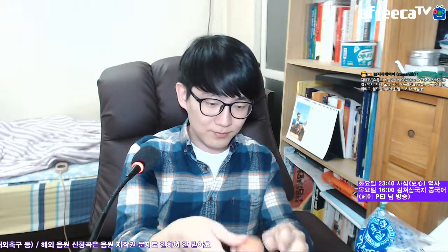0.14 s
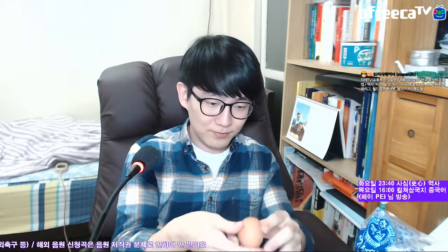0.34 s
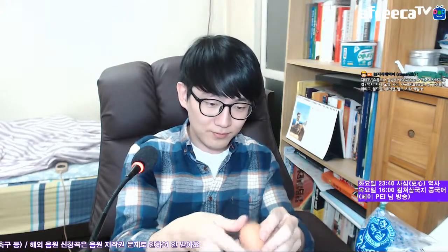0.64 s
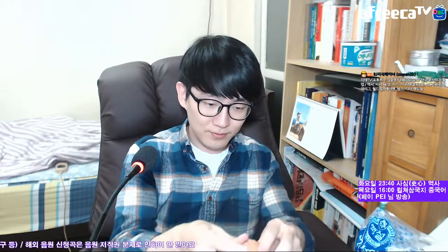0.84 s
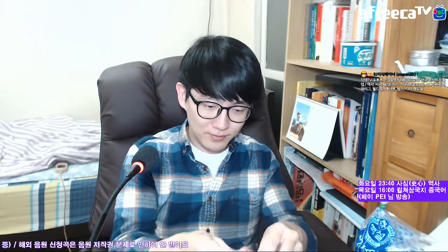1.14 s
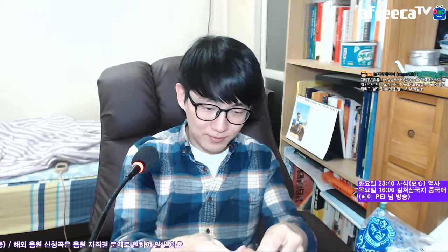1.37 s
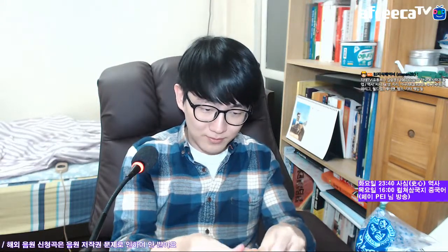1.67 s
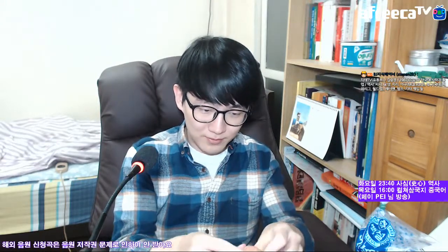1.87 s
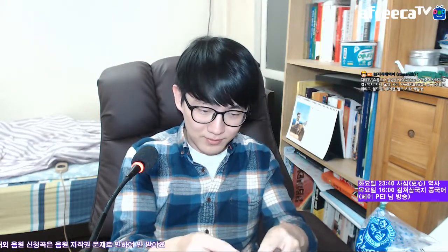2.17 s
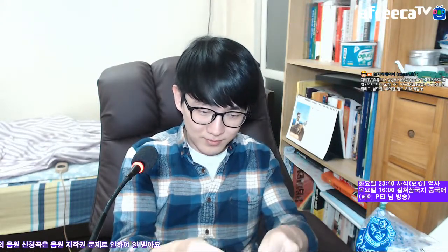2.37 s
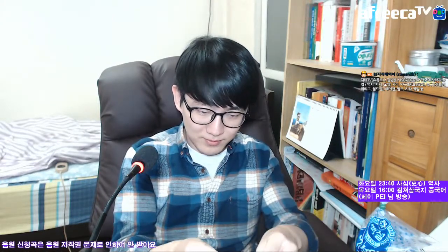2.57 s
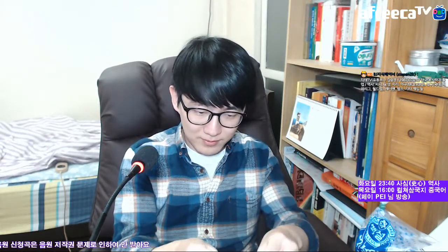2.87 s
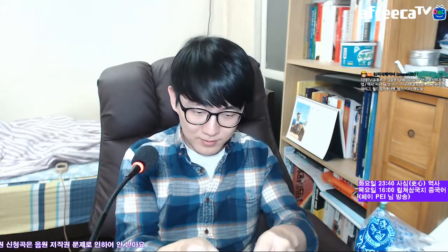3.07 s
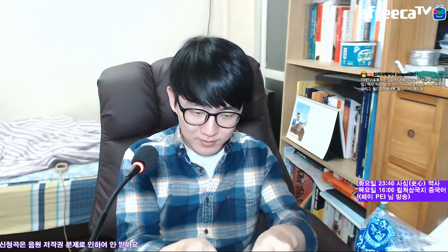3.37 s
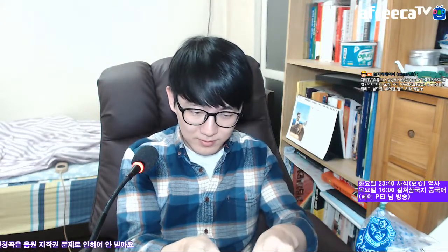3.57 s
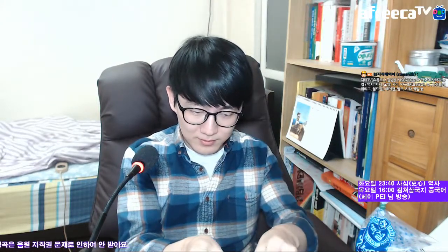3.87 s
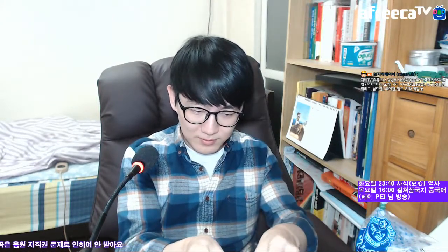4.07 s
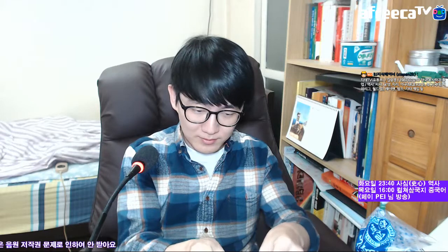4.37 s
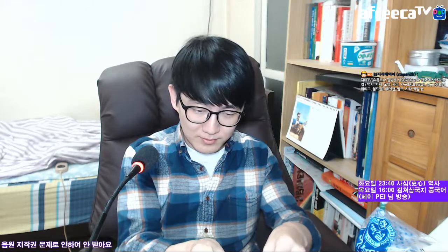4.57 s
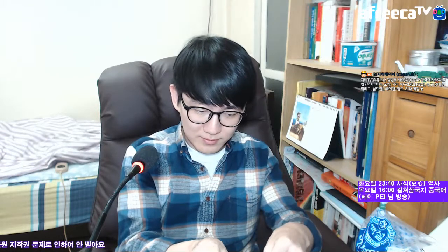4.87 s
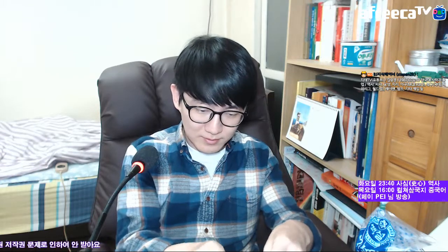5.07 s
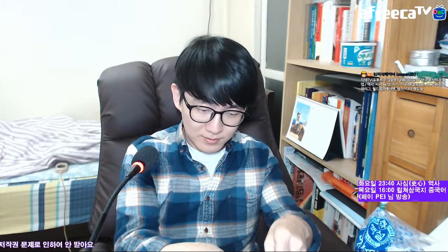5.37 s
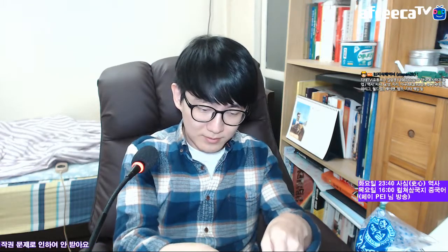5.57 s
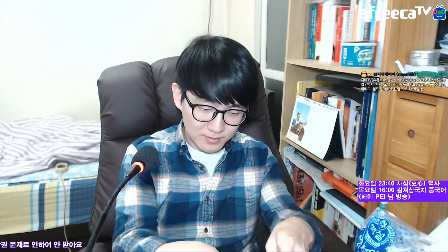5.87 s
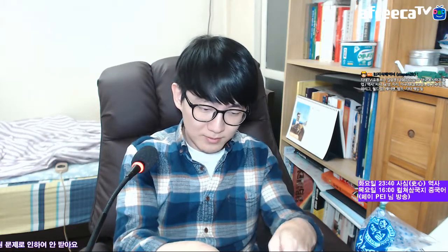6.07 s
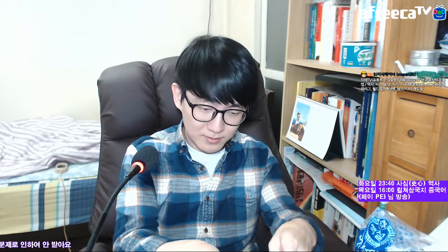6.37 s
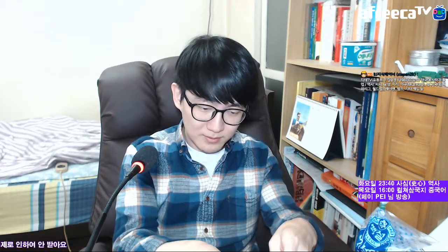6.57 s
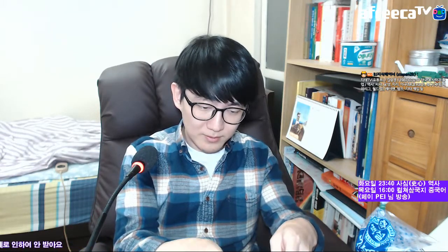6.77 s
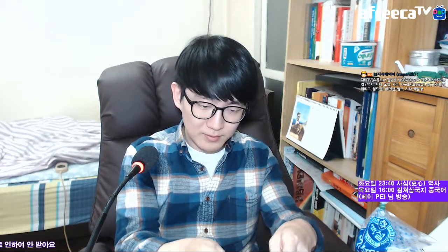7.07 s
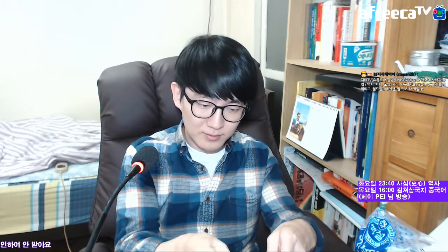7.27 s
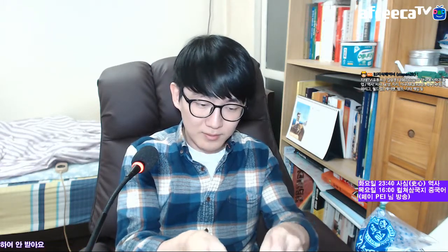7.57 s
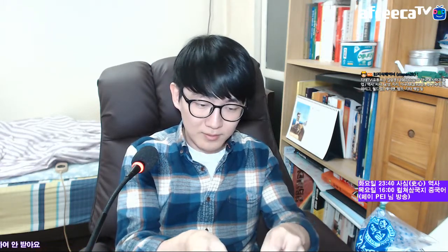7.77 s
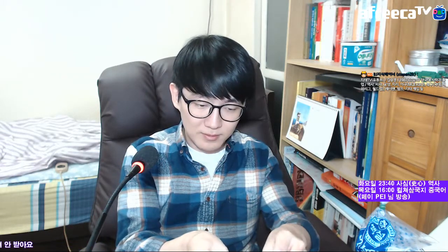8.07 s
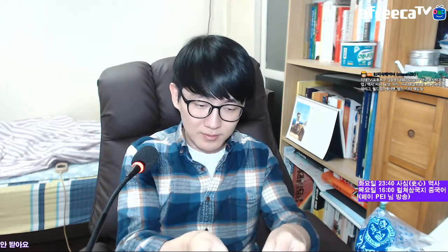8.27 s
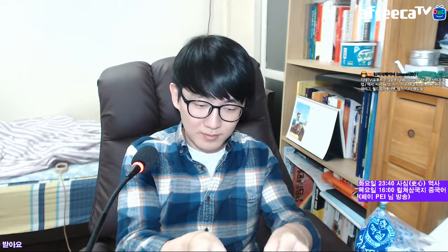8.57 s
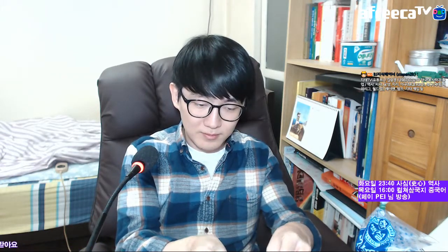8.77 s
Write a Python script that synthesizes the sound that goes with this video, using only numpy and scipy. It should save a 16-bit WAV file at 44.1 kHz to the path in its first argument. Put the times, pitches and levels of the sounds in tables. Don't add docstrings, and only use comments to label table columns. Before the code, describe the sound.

A strong, steady low mains hum, soft fan rumble, faint electronic whines and light hiss fill a small quiet room throughout. Close by, fingers peel a boiled egg. Tiny splinters tick at 0.3 and 0.7 seconds, then a dense, crisp burst of shell cracking and membrane ripping comes at 1.1 to 1.4. Smaller snaps follow around 1.8 to 2.5, and another strong crackling cluster at 3 to 3.4, with soft dull desk thuds and gritty thumb slides. Hollow pops and chips continue from 3.8 to 5.1. Flakes clink in a small ceramic dish near 4.4 and 5.3, fainter around 6. Activity nearly stops from 6 to 7, with slight ticks after 7.1. Brittle cracks and hollow pops return at 7.9 to 8.35, finishing with a sharp snap and bright dish clink around 8.9. The treble sounds thin and streamed.

```python
import sys
import numpy as np
from scipy import signal
from scipy.fft import rfft, irfft, next_fast_len
from scipy.io import wavfile
from scipy.ndimage import uniform_filter1d, map_coordinates

SR = 44100
rng = np.random.default_rng(int(sys.argv[2]) if len(sys.argv) > 2 else 0)


def voltage_ratio(decibels):
    exponent = np.asarray(decibels, float) / 20
    return 10 ** exponent


def log_audio(samples):
    frames = np.atleast_2d(samples).T
    limited = np.clip(frames, -1, 1)
    pcm = np.round(limited * 32767).astype(np.int16)
    wavfile.write(sys.argv[1], SR, pcm)


N = 393372


def unit(x):
    return x / np.sqrt(np.mean(x ** 2) + 1e-20)


def along(points, hz):
    f, v = np.transpose(points)
    return np.interp(np.log(hz + 1), np.log(f + 1), v, left=-120, right=-120)


def wobble(rate):
    knots = rng.standard_normal(int(N * rate / SR) + 4)
    return map_coordinates(knots, [np.arange(N) * rate / SR])


def noise(spectrum):
    m = next_fast_len(N)
    colour = voltage_ratio(along(spectrum, np.fft.rfftfreq(m, 1 / SR)))
    return unit(irfft(rfft(rng.standard_normal(m)) * colour, m)[:N])


def resonance(f, hz, width_hz):
    return 1j * f * width_hz / (hz ** 2 - f ** 2 + 1j * f * width_hz)


def place(times, rows):
    starts = np.round(np.asarray(times) * SR).astype(int)
    at = starts[:, None] + np.arange(rows.shape[1])
    return np.bincount(at.ravel(), rows.ravel(), N + rows.shape[1] + SR)[:N]


def hum():
    # multiple of the mains frequency, peak level/dB
    overtones = [(1, -27.2), (2, -60.5), (3, -76), (4, -76), (5, -70.5), (7, -68), (8, -79.5), (9, -77),
                 (11, -69), (13, -74.5), (15, -79), (17, -86), (19, -85), (23, -84)]
    # f/Hz, peak level/dB, wander/Hz, onset t/s
    whines = [
        (368, -63, 1.5, 0),
        (3849, -80, 8, 0),
        (3860, -82, 12, 7.8),
        (10002, -82, 8, 4.95),
        (11434, -85, 3, 0),
    ]
    mains_hz, mains_start_s = 59.994, .0016
    t = np.arange(N) / SR
    turn = 2 * np.pi * mains_hz * (t - mains_start_s)
    mix = sum(voltage_ratio(db) * np.cos(k * turn) for k, db in overtones)
    for hz, db, wander_hz, onset_s in whines:
        level = voltage_ratio(db + 1.2 * wobble(6))
        phase = 2 * np.pi * np.cumsum(hz + wander_hz * wobble(14)) / SR
        mix = mix + (t >= onset_s) * level * np.sin(phase)
    return mix


def floor():
    # f/Hz, relative level/dB per Hz
    rumble = [(8, -7), (25, -7), (50, 5.5), (75, -0.5), (100, -8), (130, -19.5), (200, -20.5), (400, -23),
              (700, -36)]
    # f/Hz, relative level/dB per Hz
    hiss = [(250, -47), (500, -10.5), (800, -8.5), (1200, -12), (1700, -13.5), (3000, -17), (6300, -20.5),
            (10400, -18), (13000, -20), (15800, -19)]
    return voltage_ratio(-53 + 0.87 * wobble(3.17)) * noise(rumble) + voltage_ratio(-65) * noise(hiss)


def cracks():
    # t/s, ring level/dB, ring f/Hz, bright over ring/dB, bright f/Hz
    splits = [(0.6547, -59.0, 2740, -2.0, 8400), (1.081, -58.5, 2740, 0.0, 7000),
              (1.1433, -55.5, 5600, 2.0, 8400), (1.1964, -49.0, 3400, -1.5, 8100),
              (1.1984, -46.0, 3500, 2.5, 8400), (1.2021, -47.5, 2890, 6.0, 7900),
              (1.2055, -45.0, 2780, 1.0, 8900), (1.217, -57.5, 3620, -0.5, 8300),
              (1.3193, -60.5, 5560, 0.0, 7900), (1.4241, -62.0, 5600, 1.0, 7400),
              (1.796, -54.0, 4770, -1.5, 8300), (2.2406, -61.5, 5600, 5.5, 6700),
              (2.883, -61.0, 2740, 3.0, 8900), (2.9824, -54.5, 3640, 2.0, 8300),
              (2.9883, -50.5, 3700, -3.0, 8600), (3.0256, -60.0, 4250, -0.5, 8500),
              (3.0384, -58.5, 4220, 4.5, 8300), (3.0524, -51.5, 4310, -6.5, 8200),
              (3.2328, -57.5, 4170, 3.5, 8700), (3.436, -59.0, 2590, -0.5, 7200),
              (3.446, -62.5, 2760, 2.0, 6700), (4.4025, -58.0, 4180, 2.0, 7100),
              (4.4561, -57.0, 4300, 1.0, 7500), (4.8577, -62.5, 5470, 5.5, 8500),
              (4.865, -58.0, 5350, 8.0, 7900)]
    # t/s, ring level/dB, ring f/Hz, bright over ring/dB, bright f/Hz
    chips = [(1.1314, -48.0, 3920, 0.5, 7200), (1.7805, -61.0, 2970, -0.5, 6800),
             (1.9161, -56.5, 3640, 6.5, 9200), (2.321, -61.5, 3270, 5.0, 6900),
             (3.2254, -56.0, 2880, 2.0, 8900), (3.2735, -49.5, 4100, 1.5, 8200),
             (3.3074, -45.5, 4200, 0.5, 7300), (3.3467, -60.0, 3660, -0.5, 7900),
             (3.3604, -58.0, 3620, -11.0, 8300), (3.917, -50.0, 5040, 0.0, 7600),
             (4.1304, -54.0, 4060, -1.0, 8800), (4.1567, -55.0, 4180, 2.0, 8100),
             (4.2106, -55.5, 3660, 0.0, 7300), (4.3064, -59.0, 5380, 2.0, 7500),
             (4.649, -55.0, 5200, 0.0, 9300), (4.692, -56.5, 5100, 2.5, 8200),
             (4.6945, -54.0, 5040, -1.0, 8300), (4.8323, -50.5, 5300, 0.5, 8700),
             (5.1213, -59.0, 5040, 0.0, 7100), (5.2838, -60.5, 4120, 8.0, 8800),
             (5.325, -69.0, 4180, 13.0, 8900), (7.451, -54.0, 4100, 1.5, 7400),
             (7.6825, -55.0, 4030, 6.5, 7500), (8.1098, -55.5, 3790, 0.5, 8300),
             (8.1478, -40.5, 3900, 2.0, 7600), (8.2015, -53.0, 3920, -4.0, 7800),
             (8.264, -59.0, 4010, -3.5, 7300), (8.2852, -50.5, 3270, -0.5, 7200),
             (8.3051, -53.0, 3010, -1.5, 7400), (8.3163, -50.5, 2730, 2.0, 8000)]
    # t/s, ring level/dB, ring f/Hz, bright over ring/dB, bright f/Hz
    snaps = [(0.6772, -66.0, 3960, 9.0, 7300), (1.1196, -60.5, 5170, 5.0, 7600),
             (1.1237, -52.0, 5700, 2.5, 7500), (1.1347, -57.0, 5660, 8.5, 7900),
             (1.17, -50.0, 2890, 8.0, 8500), (1.173, -50.5, 2890, 7.5, 8800),
             (1.9344, -53.0, 5800, 5.5, 7200), (2.2628, -64.0, 5600, 8.0, 9300),
             (2.4847, -49.5, 5250, 7.0, 9300), (2.9768, -74.5, 4360, 17.0, 8900),
             (3.1865, -67.0, 2410, 6.5, 8800), (4.2026, -65.0, 5080, 19.0, 6900),
             (4.6127, -68.0, 5340, 7.5, 7200), (6.012, -80.5, 3230, 27.0, 9500),
             (6.419, -75.5, 2580, 23.0, 9600), (8.577, -67.5, 5600, 12.5, 8500),
             (8.5848, -60.5, 5600, 6.0, 7200), (8.5906, -66.5, 3920, 16.0, 8300),
             (8.857, -57.5, 5200, 22.5, 8800), (8.8595, -60.0, 5600, 18.0, 9000)]
    # t/s, ring level/dB, ring f/Hz, bright over ring/dB, bright f/Hz
    splinters = [(0.2902, -65.5, 5510, 5.0, 9400), (0.297, -62.0, 4180, -1.0, 9400),
                 (1.2638, -52.5, 4650, -3.0, 7500), (1.2798, -69.5, 3100, 9.5, 8600),
                 (1.9063, -64.5, 2410, 0.5, 9700), (2.161, -57.5, 3620, 6.0, 8600),
                 (2.216, -64.0, 2710, 3.0, 8500), (2.4385, -66.5, 4000, 2.5, 8700),
                 (2.468, -67.5, 4000, 2.5, 9500), (2.4725, -57.0, 2780, -3.0, 9100),
                 (2.4802, -57.5, 3620, 9.5, 8900), (2.9933, -63.5, 4130, 6.5, 9300),
                 (3.0049, -58.0, 2870, 4.0, 9500), (3.042, -47.0, 5430, 3.5, 8000),
                 (3.3121, -48.5, 3600, -1.0, 8900), (3.4257, -61.5, 3530, 2.0, 8400),
                 (3.554, -64.5, 2800, 6.0, 9400), (3.7893, -54.0, 5550, 6.5, 8000),
                 (3.797, -61.5, 5600, -3.0, 8300), (3.8, -63.5, 5340, 9.0, 9800),
                 (4.2196, -57.5, 3490, 7.0, 7700), (4.3917, -58.5, 2840, 9.0, 8200),
                 (5.2691, -70.5, 4130, 11.0, 8400), (5.415, -69.0, 2820, 5.5, 9400)]
    # t/s, ring level/dB, ring f/Hz
    pops = [(3.9498, -52, 4930), (5.0163, -53, 5300), (8.167, -52, 3800), (8.214, -60, 3900),
            (4.0388, -57, 2870), (4.0813, -57.5, 4090), (7.8811, -51, 3600), (8.189, -57, 3880),
            (8.2356, -50, 3950), (8.2493, -54, 3900), (8.251, -52, 3320), (8.276, -54, 3320)]
    # body over ring/dB, edge over bright/dB
    colours = [
        (-2, -10),
        (-19, -11.5),
        (-9, -14),
        (-6.5, -.5),
        (-19, -9),
    ]
    pops_with_bright = [(*row, -14, 7500) for row in pops]
    kinds = [splits, chips, snaps, splinters, pops_with_bright]
    events = [(*row, *colour) for rows, colour in zip(kinds, colours) for row in rows]
    s, db, hz, bright_db, bright_hz, body_db, edge_db = np.transpose(events)[..., None]

    size = 2048
    t, f = np.arange(size) / SR, np.fft.rfftfreq(size, 1 / SR)
    draw = rng.standard_normal((len(s), 2, size))
    snap = voltage_ratio(-60 * t / .0012) * draw[:, 0]
    fizz = .21 * voltage_ratio(-60 * t / .017) * draw[:, 1]
    click = 1.2 * (t == 0)
    drive = rfft(snap + fizz + click)

    ring = resonance(f, hz, .18 * hz) * resonance(f, hz, 0.57 * hz) + 0.19 * resonance(f, 3740, 2800) ** 2
    body = resonance(f, 1500, 1100) * resonance(f, 2100, 2400)
    bright = resonance(f, .8 * bright_hz, 2600) * resonance(f, 1.15 * bright_hz, 2800)
    edge = resonance(f, 9650, 2000) * resonance(f, 13500, 7000)
    regions = [(0, ring), (body_db + .7, body), (bright_db, bright), (bright_db + edge_db, edge)]
    rows = 0
    for gain_db, shape in regions:
        sound = irfft(drive * shape, size)
        rows = rows + voltage_ratio(gain_db) * sound / np.linalg.norm(sound, axis=1, keepdims=True)
    return place(s[:, 0], voltage_ratio(db + 22.5) * rows)


def pulls(s, peak_db, rise_s, fade_s, power):
    hop = 8
    t = np.arange(-SR // 2, SR // 2, hop) / SR
    distance = np.where(t < 0, -t / rise_s[:, None], t / fade_s[:, None])
    shapes = voltage_ratio(peak_db[:, None] - 10 * distance ** power[:, None])
    clock = np.arange(0, N, hop) / SR
    envelope = sum(np.interp(clock, at + t, shape, 0, 0) for at, shape in zip(s, shapes))
    return envelope.repeat(hop)[:N]


def slips(centre_hz, spread, cycles, scatter_db):
    draw = rng.standard_normal((22000, 2))
    hz = np.clip(centre_hz * np.exp(spread * draw[:, :1]), 1200, 15000)
    turns = hz * np.arange(128) / SR
    grains = voltage_ratio(scatter_db * draw[:, 1:]) * np.sin(2 * np.pi * turns) * np.exp(-turns / cycles)
    return unit(place(rng.random(len(draw)) * N / SR, grains))


def tearing():
    # peak t/s, grind level/dB, fizz level/dB, time to fade 10 dB/s
    rips = [(0.295, -76.0, -70.0, 0.06), (0.675, -76.0, -65.5, 0.04), (1.132, -57.0, -62.5, 0.025),
            (1.172, -65.0, -59.0, 0.02), (1.2, -55.5, -49.5, 0.035), (1.785, -67.0, -62.0, 0.05),
            (1.92, -64.0, -66.5, 0.12), (2.48, -55.5, -64.5, 0.05), (2.982, -54.0, -59.5, 0.04),
            (3.042, -61.0, -55.0, 0.04), (3.142, -65.5, -68.5, 0.03), (3.31, -59.5, -62.0, 0.04),
            (3.555, -63.5, -67.5, 0.04), (3.792, -65.0, -56.0, 0.05), (3.95, -63.0, -67.0, 0.1),
            (4.135, -58.5, -55.5, 0.05), (4.205, -64.5, -55.5, 0.08), (4.395, -65.0, -62.5, 0.15),
            (4.835, -73.5, -61.5, 0.04), (4.862, -62.5, -61.5, 0.05), (5.272, -67.5, -57.0, 0.05),
            (5.41, -71.0, -64.0, 0.035), (7.883, -75.0, -70.0, 0.035), (8.15, -61.5, -60.5, 0.04),
            (8.858, -58.0, -45.0, 0.02)]
    # peak t/s, grind level/dB, fizz level/dB, time to fade 10 dB/s
    slides = [(1.37, -64.5, -69.5, 0.05), (2.165, -76.0, -67.0, 0.03), (2.27, -66.0, -64.5, 0.1),
              (3.225, -70.0, -63.0, 0.04), (3.35, -61.5, -67.0, 0.035), (3.435, -66.0, -69.0, 0.03),
              (3.15, -69.0, -72.0, 0.3), (3.85, -68.5, -74.0, 0.4), (4.68, -66.0, -65.0, 0.08),
              (5.04, -68.0, -68.0, 0.07), (8.105, -70.0, -64.0, 0.025), (8.26, -61.5, -71.0, 0.08),
              (8.335, -61.0, -52.0, 0.055), (8.585, -72.0, -59.0, 0.03)]
    s, grind_db, fizz_db, fade_s = np.transpose(rips + slides)
    counts = [len(rips), len(slides)]
    rise_s = np.repeat([.15, 1.1], counts) * fade_s
    power = np.repeat([1, 2], counts)
    clumps_db = 2.2 * wobble(70)
    grind_pull = pulls(s, grind_db, rise_s, 0.79 * fade_s, power)
    grind = grind_pull * slips(3200, .34, cycles=4, scatter_db=3)
    fizz_pull = pulls(s, fizz_db, rise_s, fade_s, power)
    fizz = fizz_pull * slips(7870, 0.284, cycles=2.6, scatter_db=3)
    return voltage_ratio(clumps_db - 5.5) * grind + voltage_ratio(clumps_db - 1.5) * fizz


def faint_cracks():
    # t/s, peak level/dB, f/Hz
    ticks = [(0.338, -48, 3670), (0.8, -50, 6800), (0.8804, -51, 6500), (1.3675, -52, 8500),
             (1.374, -51, 6000), (1.3845, -52, 7500), (5.006, -50, 5300), (5.085, -51, 5200),
             (4.904, -51, 6500), (1.0186, -53, 3870), (1.3515, -50, 3910), (1.3944, -49, 5660),
             (2.0583, -47.5, 3500), (2.4324, -51, 3500), (2.07, -51, 8000), (1.996, -52, 7500),
             (3.138, -48, 3680), (5.054, -47, 4990), (7.113, -50.5, 3900), (7.2609, -46, 4200),
             (7.3038, -50.5, 3630), (7.722, -51, 4010), (7.976, -50, 3910), (8.527, -55, 6000),
             (1.178, -50, 7000), (3.001, -49, 4500), (3.0625, -50, 4300), (3.247, -52, 8000),
             (3.887, -53, 10000), (4.143, -51, 3500), (7.888, -54, 8500), (8.016, -54, 3000),
             (4.4955, -53, 3000)]
    s, db, hz = (c[:, None] for c in np.transpose(ticks))
    t = np.arange(512) / SR
    burst = rng.standard_normal((len(s), len(t))) * voltage_ratio(-60 * t / 0.017)
    pitch = resonance(np.fft.rfftfreq(len(t), 1 / SR), hz, 1.24 * hz)
    rows = irfft(rfft(burst) * pitch)
    return place(s[:, 0], voltage_ratio(db + 1.5) * rows / np.abs(rows).max(axis=1, keepdims=True))


def desk():
    # t/s, peak level/dB
    thuds = [(1.121, -53.5), (1.167, -54), (1.199, -55), (1.931, -56.5), (2.478, -52), (2.988, -50.5),
             (3.037, -57), (3.309, -51), (3.794, -56), (3.91, -58), (4.193, -53.5), (4.385, -56),
             (4.83, -56), (7.678, -54.5), (8.148, -56), (8.228, -53.5)]
    s, db = (c[:, None] for c in np.transpose(thuds))
    t = np.arange(SR // 8) / SR
    swing = 1.35 * np.sin(2 * np.pi * 185 * t) * voltage_ratio(-60 * t / 0.029)
    puff = uniform_filter1d(rng.standard_normal((len(s), len(t))), size=45) * 6.5 * voltage_ratio(-60 * t / 0.052)
    soft_onset = 1 - np.exp(-t / 0.0032)
    return place(s[:, 0], voltage_ratio(db + 6.5) * (swing + puff) * soft_onset)


def hollows():
    # t/s, peak level/dB, f/Hz, time to fade
    # 10 dB/s
    rubs = [(3.315, -62, 5500, .04), (3.79, -57, 5600, .02), (3.918, -63, 4700, .012),
            (3.95, -58, 5200, .015), (1.205, -56, 1450, .012), (4.21, -59, 3600, .02),
            (3.312, -53, 14000, .004), (7.882, -59, 3600, .02), (7.976, -65, 3800, .012),
            (8.016, -66, 3800, .025), (8.108, -63, 3800, .02), (8.11, -63, 8200, .015),
            (8.149, -53, 3800, .015), (8.168, -59, 3700, .02), (8.202, -60, 3800, .02),
            (8.235, -56, 3800, .025), (8.252, -58, 3300, .03), (8.272, -58, 3300, .03),
            (8.295, -59, 3100, .02), (8.858, -44, 9000, .008)]
    s, db, hz, fade_s = (c[:, None] for c in np.transpose(rubs))
    t = np.arange(SR // 8) / SR
    cavity = resonance(np.fft.rfftfreq(len(t), 1 / SR), hz, .4 * hz) ** 2
    rub = irfft(rfft(rng.standard_normal((len(s), len(t)))) * cavity, len(t))
    envelope = voltage_ratio(db - 10 * t / fade_s) * (1 - np.exp(-t / .001))
    return place(s[:, 0], rub / rub.std(axis=1, keepdims=True) * envelope)


def dish():
    # t/s, peak level/dB, lowest mode/dB, middle modes/dB, brightness/dB
    drops = [(4.2494, -60.5, -21.0, -9.0, -9.5), (4.391, -48.5, -9.5, 6.5, -1.5),
             (4.4013, -55.5, -20.0, 3.0, -3.0), (4.4348, -59.0, -2.5, 5.0, 4.5),
             (4.4794, -63.5, -15.0, -6.5, -7.0), (5.268, -51.5, -19.0, -2.5, 1.0),
             (5.2842, -47.0, -5.0, -5.0, -3.0), (5.325, -70.0, 8.0, 16.0, 15.5),
             (5.3724, -75.0, 6.0, 16.0, 17.0), (5.3962, -54.0, -5.0, -8.0, -8.5),
             (5.414, -69.0, 9.0, 17.0, 9.5), (5.9625, -61.0, -3.0, -11.0, 3.0),
             (5.972, -61.5, -7.5, -5.5, -1.5), (6.02, -64.0, -6.5, 2.0, -5.0),
             (6.055, -64.0, -8.0, -8.0, 0.5), (6.489, -69.5, -12.0, 0.5, -0.5), (8.8607, -50, 0, -3, 3),
             (8.8717, -41, 0, 2, 4), (8.8815, -55.0, 4.5, 8.5, 5.5), (8.9134, -52.5, 9.5, 12.5, 10.0)]
    mode_hz = [2848, 4156, 5782, 5922, 7284, 7747, 7930, 8597, 9665, 10600, 11720, 12140, 13770]
    # level/dB, t60/s
    mode_decay = [(2, 0.08), (-1, 0.12), (-18, .09), (-5, 0.093), (-20, .1), (-9, 0.067), (1, 0.04),
                  (-9, 0.07), (0, 0.075), (-9, 0.06), (-10, .07), (-8, .08), (-9, 0.054)]
    s, db, low_db, middle_db, bright_db = (c[:, None, None] for c in np.transpose(drops))
    hz, level_db, t60 = (c[:, None] for c in [np.array(mode_hz), *np.transpose(mode_decay)])
    lowest = hz < 3500
    middle = (hz > 5000) & (hz < 6500)
    high = hz > 6500
    t = np.arange(SR // 6) / SR
    spot = rng.standard_normal((len(s), len(hz), 2))
    strength_db = db - 2.5 + level_db
    strength_db = strength_db + (low_db - 1.5) * lowest + (middle_db - 4) * middle
    strength_db = strength_db + (bright_db - 2.5 + 2.5 * spot[..., :1]) * high
    rings = voltage_ratio(strength_db - 60 * t / t60) * np.sin(2 * np.pi * hz * t + spot[..., 1:])
    rings = rings * (1 - np.exp(-t / 0.00046))
    chatter = uniform_filter1d(rng.standard_normal(rings.shape, dtype=np.float32), size=140)
    return place(s.ravel(), (rings * (1 + 5.5 * chatter)).sum(axis=1))


def room(x):
    # f/Hz, t60/s
    decay = [(300, 0.3), (2000, .2), (8000, 0.089), (15000, 0.059)]
    hz, t, z = signal.stft(rng.standard_normal(SR // 2), SR, nperseg=256)
    t60 = np.interp(hz, *np.transpose(decay))[:, None]
    tail = signal.istft(z * voltage_ratio(-60 * t / t60), SR, nperseg=256)[1]
    delayed = np.pad(x, (150, 0))
    return signal.fftconvolve(delayed, tail / np.linalg.norm(tail))[:N]


def scene():
    dull = signal.butter(2, 11000, fs=SR, output="sos")
    near = signal.sosfilt(dull, cracks() + tearing() + faint_cracks() + desk() + hollows() + dish())
    return (near + voltage_ratio(-10) * room(near) + hum() + floor())[None]


def streamed(x):
    hz, _, z = signal.stft(x, SR, window="cosine", nperseg=2048)
    hiss = uniform_filter1d(np.median(np.abs(z), axis=2, keepdims=True), size=24, axis=1)
    threshold = np.interp(hz, [2500, 9000, 15000], [0, 1, 1.4])[:, None]
    kept = np.abs(z) > hiss * threshold
    limit = (hz < 15900)[:, None]
    return signal.istft(z * kept * limit, SR, window="cosine", nperseg=2048)[1][:, :N]


def low_pass(x):
    return signal.sosfilt(signal.butter(12, 16500, fs=SR, output="sos"), x)


def record(dry):
    return low_pass(streamed(dry))


dry = scene()
out = record(dry)
log_audio(out)
```